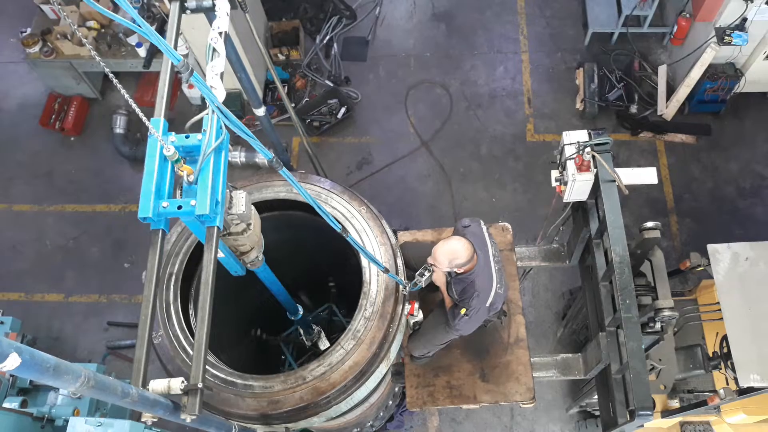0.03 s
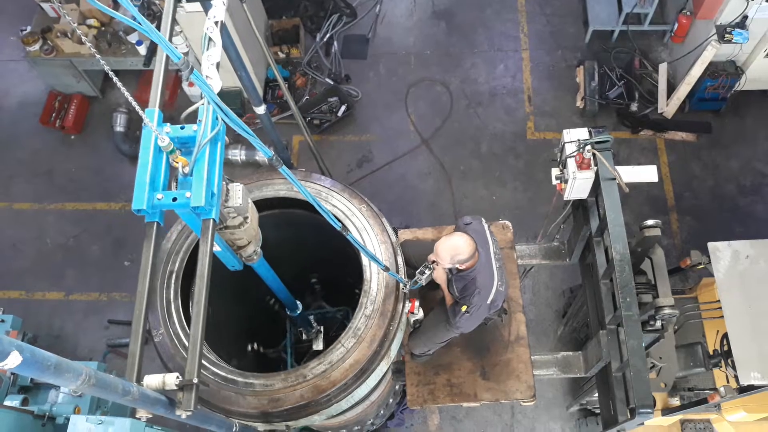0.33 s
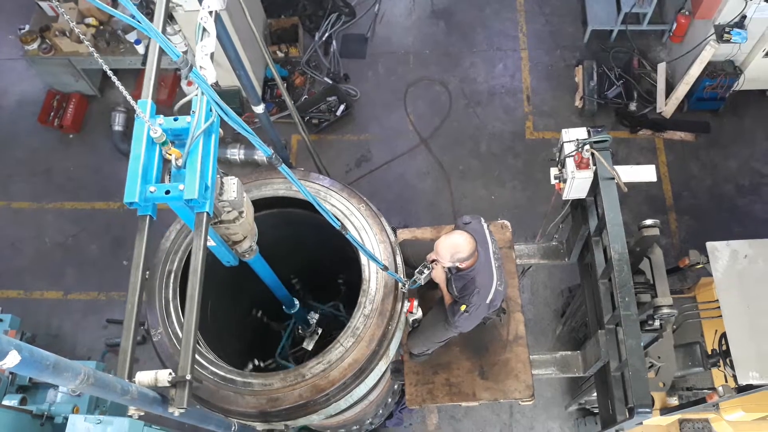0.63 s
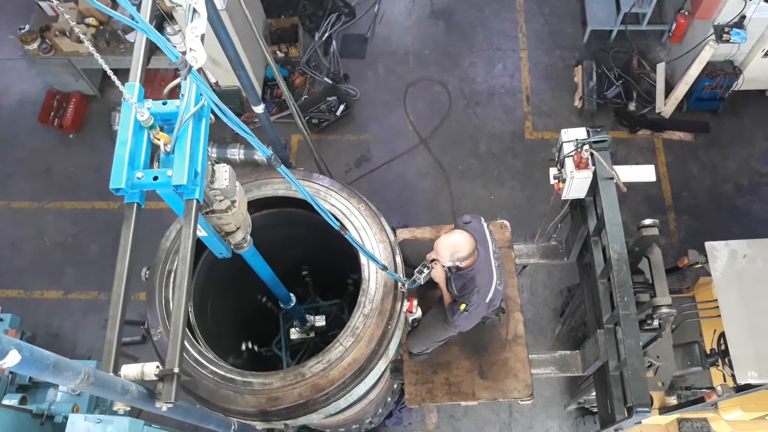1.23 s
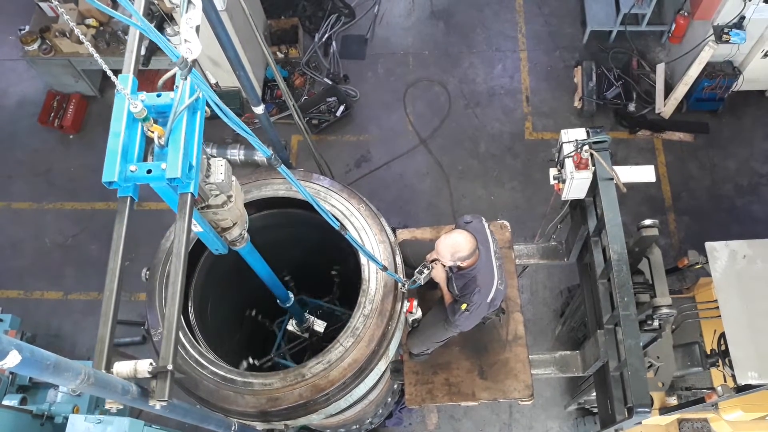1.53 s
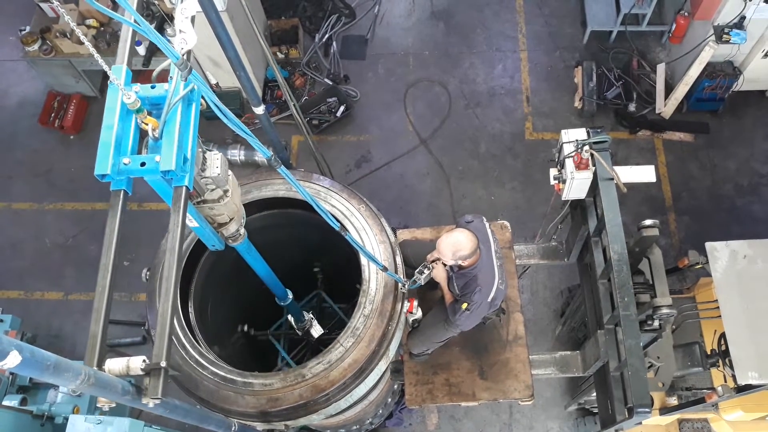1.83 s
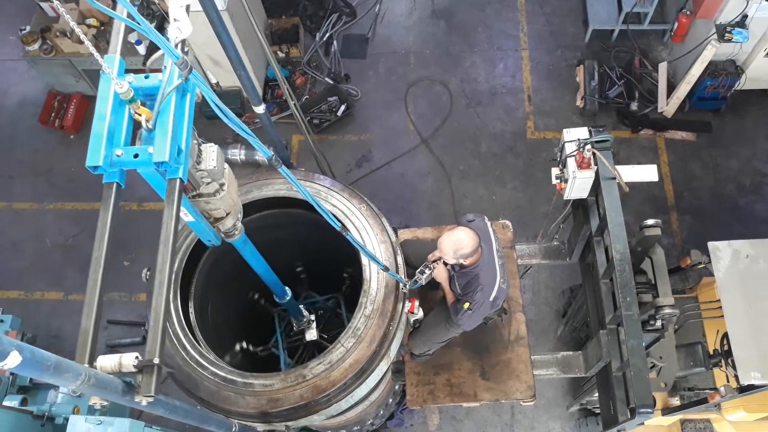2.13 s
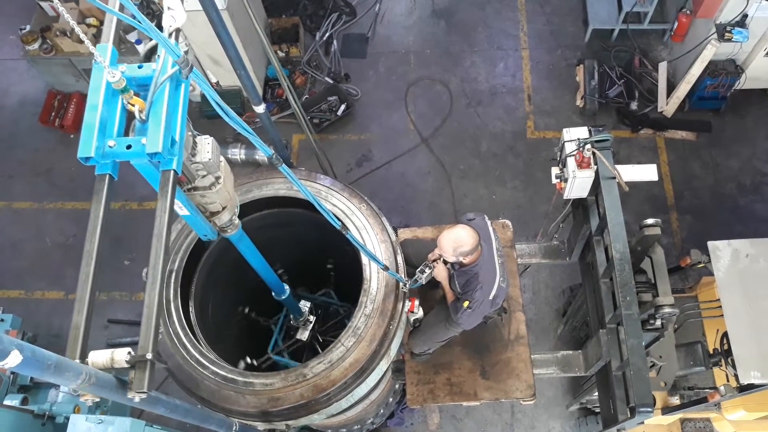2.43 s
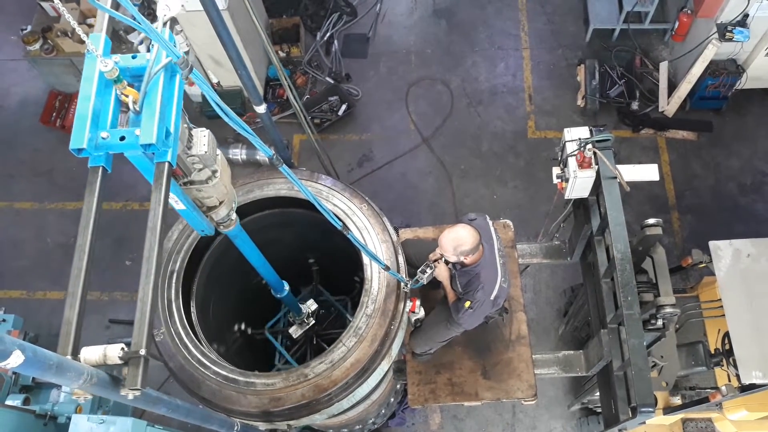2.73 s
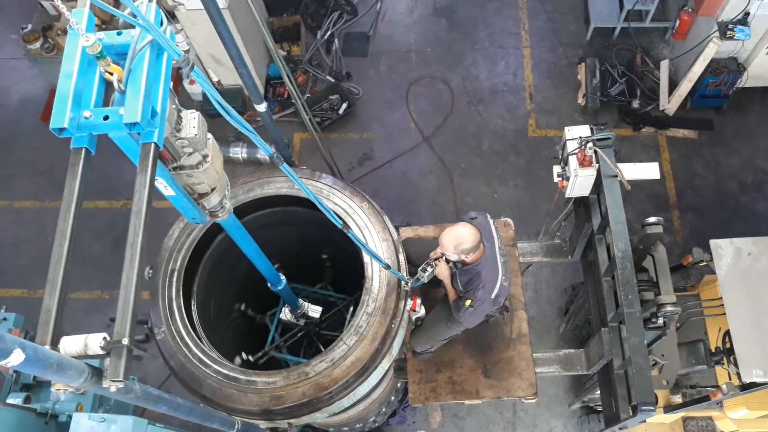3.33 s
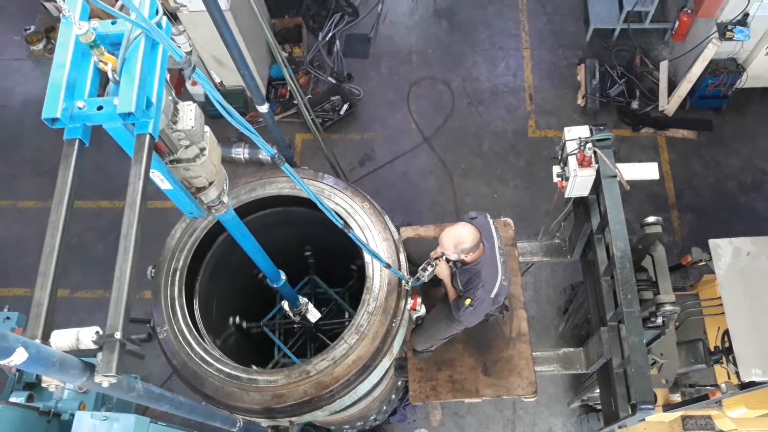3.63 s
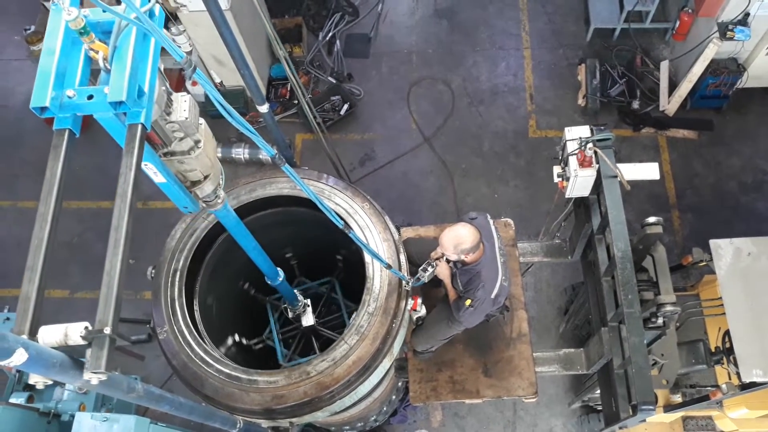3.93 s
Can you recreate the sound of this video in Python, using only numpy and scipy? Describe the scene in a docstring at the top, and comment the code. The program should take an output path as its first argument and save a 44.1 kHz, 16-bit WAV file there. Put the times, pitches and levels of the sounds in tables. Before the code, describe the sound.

A large honing machine runs throughout, heard from above in a slightly echoing workshop. Its hydraulic whine wavers about seven times a second over steady grinding, hissing oil and a faint motor hum. From 0.3 to 1.6 seconds the stones give short, thin, very high squeaks. Soft low rumbles swell around 3 seconds, and near 3.5 seconds the stones bite deeper in one brief scrape.

```python
"""A large honing machine runs steadily in a workshop, heard from above the cylinder.
The sound cuts in on a whining hydraulic drive, its pitch swinging about seven times a second with
the load and smeared by the hall, over grinding stones, hissing oil and a faint motor hum.
From 0.3 to 1.6 s the stones stick and slip in thin squeaks. Around 3 s the frame rumbles,
and near 3.5 s the stones bite deeper in one scrape."""
import sys
import numpy as np
from scipy import signal
from scipy.fft import rfft, irfft
from scipy.io import wavfile
from scipy.ndimage import uniform_filter1d

SR = 44100
rng = np.random.default_rng(int(sys.argv[2]) if len(sys.argv) > 2 else 0)


def generate_wav(signal):
    """Clip the signal to [-1, 1] and save it as 16-bit WAV at the path in sys.argv[1]."""
    frames = np.transpose(np.atleast_2d(signal))
    scaled = np.clip(frames, -1, 1) * 32767
    pcm = np.round(scaled).astype(np.int16)
    wavfile.write(sys.argv[1], SR, pcm)


N = 176400


# Pitch ride of the drive, before the swing: time_s, pitch_hz
DRIVE_PITCH = [(0.1, 426.4), (.7, 429.5), (1.1, 424.8), (1.45, 430), (1.7, 425.5), (2.1, 429.8),
               (2.4, 426.2), (2.85, 430.8), (3.2, 429), (3.9, 432.1)]
# Pump whine: harmonic_number, level_db, reverb_send_db
PUMP_HARMONICS = [(1, -27.5, -0.5), (2, -31, 1), (3, -24, -3.5), (4, -45, -4), (5, -41, -1), (6, -38.5, 1)]
# Gear tones at nominal speed: pitch_hz, level_db
GEAR_TONES = [(785, -38.5), (1004, -44), (1120, -41.5), (1240, -34), (1520, -38), (1815, -36.5),
              (2535, -32.5), (2712, -40), (3070, -41)]
# Fader ride of the low throb; the ring above it follows: time_s, level_db
THROB_RIDE = [(0.1, -43), (.68, -48.5), (.8, -41), (1.3, -45), (2.2, -47), (2.8, -52), (4, -54)]

def drive(t, swing, nominal_hz=429, throb_hz=221.6, ring_hz=777.6):
    """Pump whine, gears, a low throb and a higher ring all follow one swinging shaft speed."""
    swing_depth, jitter_depth = 0.0251, 0.00602  # fractions of the speed
    speed = curve(t, DRIVE_PITCH) / nominal_hz * (1 + swing_depth * swing + jitter_depth * walk(60))
    pump = 0
    for harmonic, level_db, send_db in PUMP_HARMONICS:
        flutter = undb(1.5 * walk(60))
        whine = tone(harmonic * nominal_hz * speed) * flutter
        pump += undb(level_db) * unit(hall(whine, send_db))
    gears = sum(undb(db) * unit(hall(tone(hz * speed), send_db=5)) for hz, db in GEAR_TONES)
    tremble = undb(3.5 * walk(45))
    throb = unit(hall(tone(throb_hz * speed) * tremble, send_db=-4))
    ring = undb(7.5) * unit(hall(tone(ring_hz * speed), send_db=4))
    return pump + gears + (throb + ring) * undb(curve(t, THROB_RIDE))


# EQ of the grinding bed: freq_hz, gain_db
GRIND_EQ = [(25, -52), (65, -40), (110, -20), (170, -19), (300, -14.5), (520, -14.5), (700, -6), (950, -4),
            (1150, -2), (1450, 1), (2000, 0), (2650, 0), (3100, -2.5), (3600, -10.5), (4500, -16),
            (8000, -33), (15000, -60)]
# Midrange EQ of the scrape: freq_hz, gain_db
SCRAPE_EQ = [(600, -32), (950, -6), (1200, 3), (1500, -1), (1900, -10), (3000, -33)]
# Cue for the deeper bite: peak_s, half_length_s, level_db
SCRAPE_CUES = [(3.55, 0.18, -26)]

def stones(t, swing, level_db=-20.5, swing_db=0.2, flicker_db=0.54):
    """Abrasive stones scour the bore, a touch louder as the drive slows, and once bite deeper."""
    grind = noise(GRIND_EQ) * undb(level_db - swing_db * swing + flicker_db * walk(39.8))
    scrape = noise(SCRAPE_EQ) * swells(t, SCRAPE_CUES)
    return grind + scrape


# Bright EQ of the oil hiss: freq_hz, gain_db
OIL_EQ = [(1500, -29), (3000, -5), (3900, -1), (4750, 2), (5300, -5), (5900, -8.5), (7000, -8),
          (7900, -5.5), (8700, -14), (9150, -13.5), (9550, -21), (11700, -18.5), (12300, -11), (13300, -14),
          (14500, -12.5), (15600, -19.5)]

def oil(level_db=-25, flicker_db=0.13):
    """Oil hisses through the valves, flickering a little."""
    return noise(OIL_EQ) * undb(level_db + flicker_db * walk(24.9))


# Cues for the stone squeaks: peak_s, half_length_s, level_db
SQUEAK_CUES = [(.33, .025, -45), (.47, .02, -42), (.527, .012, -44), (.635, .034, -31.5), (0.753, .02, -36),
               (.8, 0.025, -30), (.885, .032, -36), (.983, .014, -33), (1.025, .014, -43),
               (1.12, 0.021, -30.5), (1.266, .013, -29.5), (1.425, .02, -33), (1.565, .012, -36)]

def squeaks(t, pitch_hz=10880, sag_hz_per_s=59, wander_hz=55, chatter_hz=70, chatter_db=4.5):
    """A stone sticks and slips: short, chattering, very high notes that sink slowly."""
    pitch = pitch_hz - sag_hz_per_s * t + wander_hz * walk(700)
    chatter = undb(chatter_db * tone(chatter_hz * (1 + .25 * walk(40))))
    squeal = unit(tone(pitch) * chatter)
    return hall(swells(t, SQUEAK_CUES) * squeal, send_db=-11)


# Dark EQ of the frame: freq_hz, gain_db
FRAME_EQ = [(45, -45), (110, -12), (200, -4.5), (310, 2.5), (380, -2), (600, -22), (2000, -50)]
# Cues for its rumbles: peak_s, half_length_s, level_db
RUMBLE_CUES = [(2.66, .11, -39), (3.042, .04, -35.5), (3.2, 0.11, -43.5)]

def frame_rumble(t):
    """The frame rumbles in soft, low swells."""
    return noise(FRAME_EQ) * swells(t, RUMBLE_CUES)


# Low tones of the motor: pitch_hz, level_db
HUM_TONES = [(49, -73), (99, -57.5), (117, -57), (144, -64.5)]

def motor(drift_hz=1.5, waver_db=2.2):
    """The motor hums under everything, each tone wavering in pitch and level."""
    return sum(undb(db) * unit(tone(hz + drift_hz * walk(8)) * undb(waver_db * walk(6.7)))
               for hz, db in HUM_TONES)


def hall(x, send_db, t60_s=0.86, predelay_s=0.007):
    """The direct sound plus the diffuse tail of the workshop."""
    age = np.arange(SR) / SR
    tail = rng.standard_normal(SR) * np.exp(-np.log(1000) * age / t60_s) * (age > predelay_s)
    return x + undb(send_db) * signal.fftconvolve(x, tail / np.linalg.norm(tail))[:N]


def undb(db):
    """Decibels to gain."""
    return 10 ** (np.asarray(db) / 20)


def unit(x):
    """Scale to rms 1."""
    return x / np.sqrt(np.mean(x ** 2))


def curve(t, rows):
    """Straight ramps through (time_s, value) rows."""
    return np.interp(t, *np.array(rows).T)


def walk(rate_hz):
    """Smooth random modulation with a spread near 1."""
    hold = int(SR / rate_hz)
    steps = np.repeat(rng.standard_normal(N // hold + 1), hold)
    return 1.307 * uniform_filter1d(uniform_filter1d(steps, hold), hold)[:N]


def noise(eq):
    """Noise of rms 1, coloured by (freq_hz, gain_db) rows."""
    hz, db = np.array(eq).T
    bins_hz = np.maximum(np.arange(N // 2 + 1) * SR / N, 1)
    gain = undb(np.interp(np.log(bins_hz), np.log(hz), db))
    return unit(irfft(rfft(rng.standard_normal(N)) * gain, N))


def tone(hz):
    """A sine that follows a pitch curve."""
    return np.sin(2 * np.pi * (np.cumsum(hz) / SR + rng.random()))


def swells(t, cues):
    """An envelope with one bell-shaped swell for each cue."""
    return sum(undb(db) * np.exp(-((t - peak_s) / half_s) ** 2) for peak_s, half_s, db in cues)


def scene(swing_hz=6.873, crest_s=.115):
    """The whole machine in centred mono; one uneven load swing moves both drive and stones."""
    t = np.arange(N) / SR
    swing = np.cos(2 * np.pi * swing_hz * (t - crest_s)) * (1 + 0.23 * walk(7))
    mono = drive(t, swing) + stones(t, swing) + oil() + squeaks(t) + frame_rumble(t) + motor()
    return np.array([mono, mono])


def record(dry, start_s=.105, attack_s=0.0033, start_db=-2.0, settle_s=0.49, high_cut_hz=15750):
    """The sound cuts in a little soft and comes up to level, through a steep high cut."""
    age = np.arange(N) / SR - start_s
    gate = np.clip(age / attack_s, 0, 1)
    settle = undb(start_db * np.clip(1 - age / settle_s, 0, 1))
    high_cut = signal.ellip(10, .1, 80, high_cut_hz, fs=SR, output="sos")
    return signal.sosfilt(high_cut, dry * gate * settle)


dry = scene()
out = record(dry)
generate_wav(out)
```